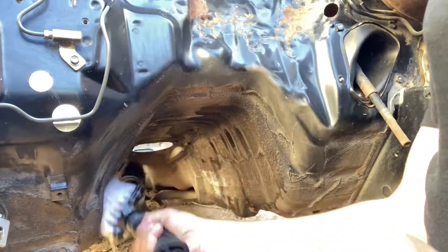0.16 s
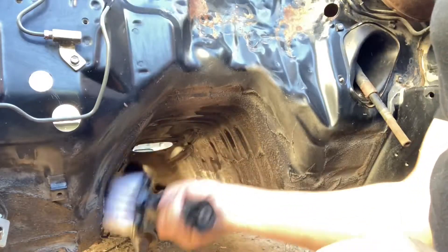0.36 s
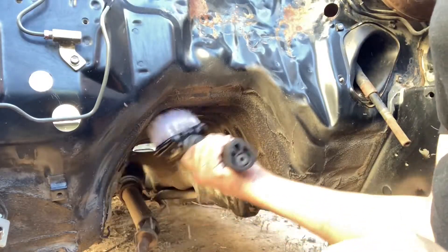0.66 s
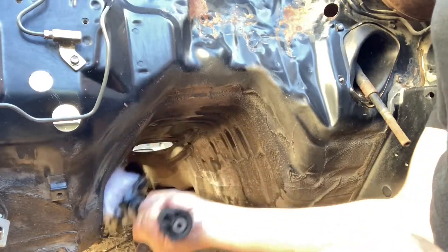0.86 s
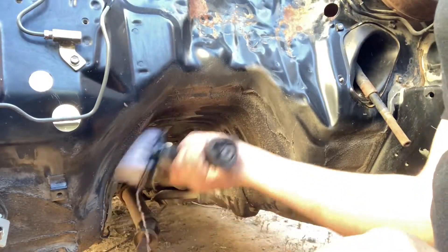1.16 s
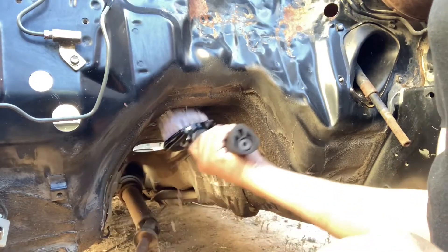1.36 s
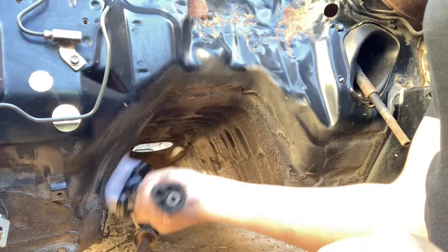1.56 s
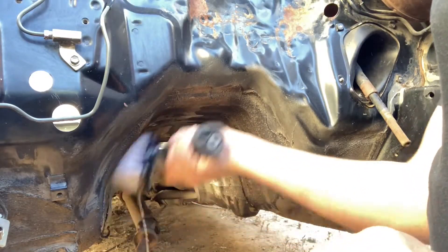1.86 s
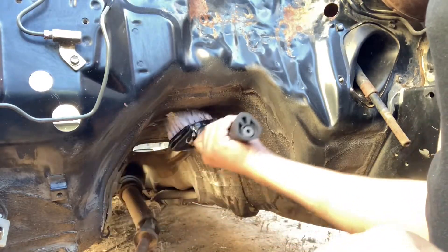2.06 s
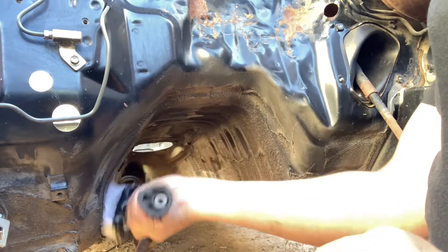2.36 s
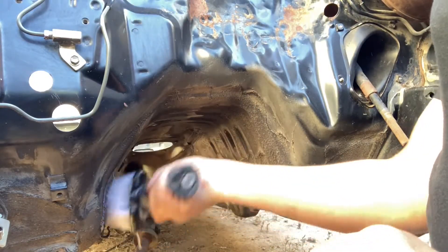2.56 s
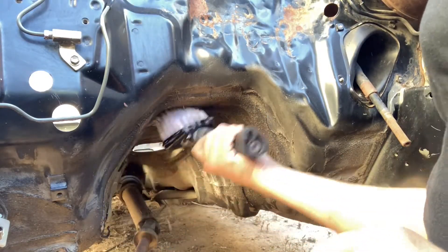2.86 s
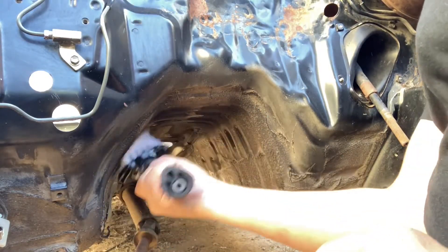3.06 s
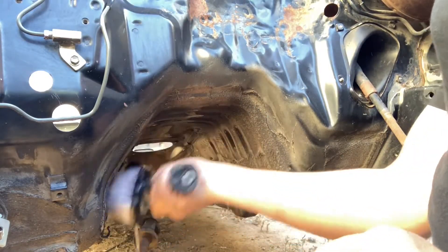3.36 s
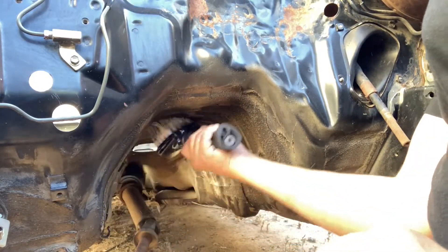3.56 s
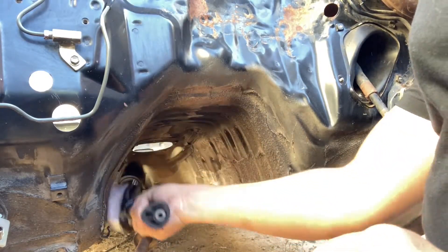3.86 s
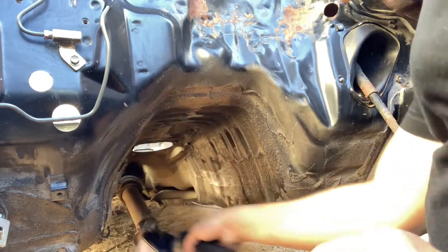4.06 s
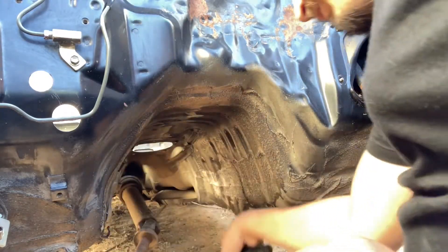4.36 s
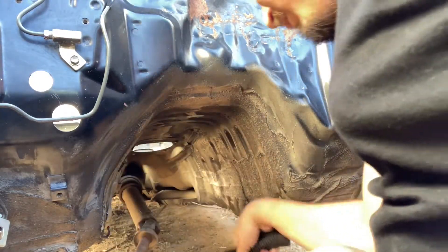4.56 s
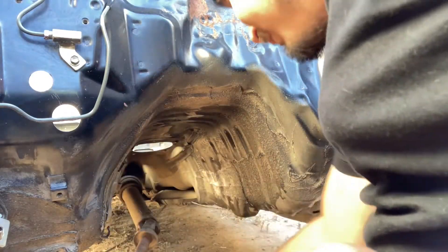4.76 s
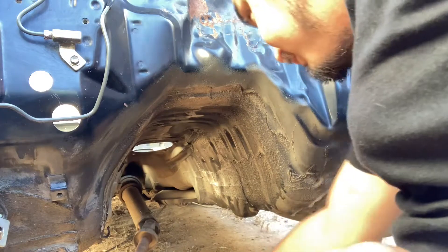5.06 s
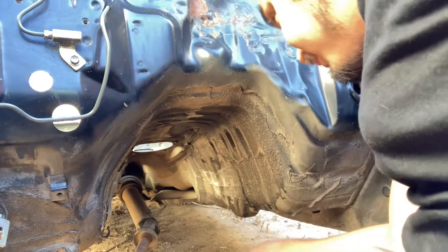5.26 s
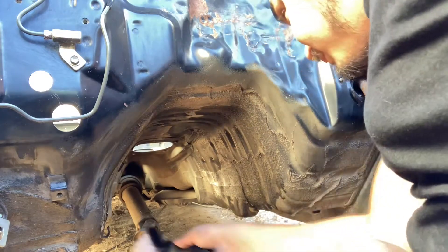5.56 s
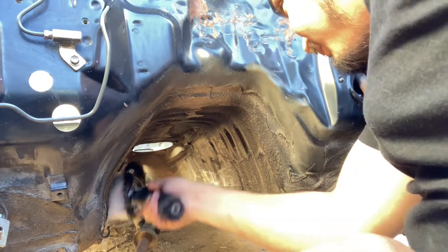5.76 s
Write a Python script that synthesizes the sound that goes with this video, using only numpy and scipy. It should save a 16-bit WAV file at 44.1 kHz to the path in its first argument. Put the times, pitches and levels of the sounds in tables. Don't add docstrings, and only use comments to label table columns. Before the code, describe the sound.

Close by, a stiff-bristled brush scrubs a thin metal car panel, about three strokes a second, each harsh hiss waking a hollow drumming resonance. Two booming knocks of the brush block interrupt. After nearly four seconds the brush lifts away; cloth rustles, grit crackles and small taps cluster. A final brighter stroke begins. Low workshop rumble lies underneath, on a close two-channel phone microphone.

```python
import sys
import numpy as np
from scipy import signal
from scipy.fft import rfft, irfft
from scipy.io import wavfile
from scipy.ndimage import uniform_filter1d

SR = 44100
rng = np.random.default_rng(int(sys.argv[2]) if len(sys.argv) > 2 else 0)


def master_out(mix):
    frames = np.transpose(np.atleast_2d(mix))
    ceiling = np.clip(frames, -1, 1)
    pcm = np.round(ceiling * 32767).astype(np.int16)
    wavfile.write(sys.argv[1], SR, pcm)


def decibels_to_gain(level_db):
    exponent = np.asarray(level_db, float) / 20
    return 10 ** exponent


N = 261072
HZ = np.fft.rfftfreq(N, 1 / SR)
COARSE_S = np.arange(0, N + 32, 32) / SR

# start in seconds, length in seconds, hiss level at the start in dB,
# hiss level at the end in dB, swell in the middle in dB.
STROKES = [(-.05, 0.19, -42, -48.5, -0.9), (.328, 0.15, -42, -44.5, -0.5), (.645, 0.19, -52, -43.5, 2.5),
           (1.038, 0.18, -45, -45.5, 1.5), (1.364, 0.21, -52, -47.5, 5), (1.772, 0.17, -44.5, -47, 2),
           (2.128, 0.17, -47.5, -43, 1), (2.522, .19, -46.5, -43.5, 1), (2.87, 0.22, -54.5, -40.5, -2),
           (3.33, 0.13, -43, -46, 0.5), (3.605, 0.25, -50, -49.5, 6), (5.618, 0.34, -56.5, -50, 12)]
# brightness in dB per octave, then deep mode, wall mode and rib squeak
# in dB against the hiss.
STROKE_SPOTS = [(-4, 0.5, -4, -9), (-0.8, -10, -10, -30), (-2.5, -1, -1.5, -8.5), (0.6, -9, -6.5, -16),
                (-1, -5, 3.8, -7.5), (-0.3, -15, -4.5, -2.5), (-2.5, -6, -8, -9.5), (3, -13.5, -6.5, -17.5),
                (-2.5, -9, -2.5, -8.5), (1.2, -2, -3.5, -1.5), (-3, -7.5, -.6, -8.5),
                (5.2, -17, -7.5, -10.5)]
# frequency in Hz, width in Hz, level in dB.
SPOT_MODES = [(310, 6.3, -3), (461, 107, -3.5), (2750, 39, -5.5)]
# frequency in Hz, density in dB per Hz.
BRISTLE_SPECTRUM = [(120, -19.5), (260, -18), (350, -18.5), (500, -8.5), (900, -12), (1500, -10.5),
                    (2300, -9.5), (4000, -9), (5000, -26), (6800, 19.5), (9000, -73.5), (10400, -35),
                    (13000, -40.5), (16000, -51)]
# frequency in Hz, width in Hz, level in dB.
PAN_MODES = [(235.7, 6, -2.5), (863, 104, -8), (1223, 58, -6), (2064, 15, -18)]
# frequency in Hz, width in Hz, level in dB.
LAST_PAN_MODES = [(548, 64, 0), (862, 74, -9.5), (1240, 13, 0), (1760, 150, -2), (2800, 32, -15),
                  (3120, 83, -4.5), (3900, 110, -0.5), (3970, 11, -10)]
RISE_DB_PER_S, FALL_DB_PER_S = (430, 600), (330, 235)
FLEX_DB, FLEX_DB_PER_S = -20, 49
LIFT_S, LIFT_DB_PER_S, LAND_S = 3.87, 192, 5.6
FULL_DB, DULLING = -46, 0.29
RING_FALL_DB_PER_S = 141.5

# time in seconds, peak in dB.
KNOCKS = [
    (1.867, -9),
    (3.437, -12.5),
]
# frequency in Hz, level in dB, 60 dB decay in seconds.
KNOCK_MODES = [
    [(109.3, -14, 0.62), (231, -6.5, 0.68), (307.5, 3.5, 0.4), (382, -46, 0.73), (469, -4.5, 0.47),
     (554, 4, 0.24), (703, -44, 2.3), (784, -10, 0.12), (1050, -32, 0.1), (1140, -29, 0.31),
     (1251, -17.5, 0.5), (1530, -28, 0.1), (1620, -15, 0.33), (1683, -31, 0.33)],
    [(231, -4, 0.62), (325.2, 2, 0.29), (420, 5.5, 0.14), (473, -7, 0.33), (568, -1, 0.24),
     (797, -5.5, 0.4), (940, -13, 0.32), (1138, -8, 0.32), (1156, -41, 0.27), (1291, 3, 0.14),
     (1707, -39, 0.14), (2290, -22, 0.19), (2680, -41.5, 0.41), (3470, -42.5, 0.23), (3537, -36.5, 0.19),
     (3978, -42, 0.28)],
]
# level in dB, frequency in Hz, width in Hz.
BLOCK_CRACKS = [(-23, 3400, 2400), (2, 3000, 290)]
# frequency in Hz, first knock in dB, second knock in dB, 60 dB decay in seconds.
BODY_BOOM = [(97.3, -18, -30, 0.43), (250, -14.5, -10.5, 0.54), (500, -9, -12, 0.36),
             (1000, -15, -10.5, 0.24), (2000, -21.5, -17.5, 0.16), (4000, -35, -26.5, 0.2)]

# peak time in seconds, peak in dB, rise over 20 dB in seconds, fall over 20 dB in seconds,
# brightness in dB per octave.
SWISHES = [(4.094, -40.5, .01, 0.054, -1), (4.171, -52.5, 0.035, 0.12, -6), (4.255, -62, 0.084, .05, -5),
           (4.37, -54.5, .12, 0.074, -5), (4.418, -55, 0.13, 0.027, 4), (4.692, -65, 0.03, 0.21, -2.5),
           (4.77, -64, 0.116, 0.12, -1.5), (4.845, -65.5, 0.026, 0.15, -9),
           (4.868, -45.5, 0.015, 0.0092, 6), (4.893, -52, .01, 0.044, -3), (5.08, -61, 0.081, 0.15, -6.5),
           (5.17, -65.5, 0.088, 0.15, -9.5), (5.27, -61, 0.053, 0.05, -7.5), (5.38, -58, 0.17, 0.079, 4.5),
           (5.557, -57, 0.0071, 0.026, 2.5)]
# frequency in Hz, density in dB per Hz.
CLOTH_SPECTRUM = [(180, -45), (300, -2), (397, -14), (580, -36), (920, -23.5), (1280, 0.5), (1690, -10.5),
                  (2240, -10), (6430, -10.5), (14200, -73.5), (15400, -37)]
# frequency in Hz, width in Hz, level in dB.
HANDLE_MODES = [(905, 120, -9), (1730, 43, -8.5), (2950, 200, -10)]
# time in seconds, peak in dB, ring in Hz, upper ring in Hz, tick in dB.
TAPS = [(.345, -35.5, 218.5, 525, -17), (3.336, -31.5, 235, 500, -4), (4.089, -47.5, 362, 1120, 1),
        (4.166, -47, 410, 1620, -3), (4.416, -52.5, 554, 1190, -5), (4.498, -67, 468, 2750, 9),
        (4.679, -58.5, 390, 950, -1), (4.69, -44.5, 362, 1690, -14), (4.837, -54, 430, 1650, -4),
        (4.848, -36.5, 452, 730, -17), (4.862, -37.5, 457, 1758, -0.5), (4.893, -48, 453, 1740, 8),
        (4.955, -60.5, 390, 1100, 10.5), (4.746, -42.5, 394, 890, -13), (5.033, -39, 397, 740, -8),
        (5.074, -37.5, 420, 1000, -8), (5.098, -42.5, 398, 1110, -3), (5.138, -51, 397, 870, -2),
        (5.2, -44, 382, 933, 5), (5.262, -49.5, 378, 940, -9), (5.3, -43.5, 400, 895, -8),
        (5.341, -51, 370, 1660, -7), (5.552, -36, 413, 1060, -16), (5.609, -38.5, 567, 2260, -7)]
RING_CYCLES, UPPER_CYCLES = 38, 45

# frequency in Hz, density in dB per Hz.
RUMBLE_SPECTRUM = [(13, -46), (22, -46.5), (36, -11), (55, -7), (82, -4.5), (127, -14.5), (180, -16.5),
                   (400, -26), (800, -30), (1500, -45), (3000, -47), (6000, -59), (10000, -62),
                   (15400, -65)]
# time in seconds, level in dB.
RUMBLE_LEVEL = [(0.0, -52), (1.4, -52), (2.04, -46.5), (2.98, -50), (3.43, -47), (3.81, -46), (4.15, -49),
                (4.65, -51), (5.08, -48), (5.92, -51.5)]
# frequency in Hz, width in Hz, level in dB.
ROOM_MODES = [(53, 11, 6), (78, 23, 4.5), (111.1, 15, 6.5), (114.1, 5, 7)]

# frequency in Hz, difference in dB.
LEFT_LOUDER = [(60, 0), (110, 6.5), (200, 1.5), (380, 10), (700, 1), (1290, 3.5), (2380, 0), (4400, 1.0),
               (8120, 4), (15000, -3.5)]
# frequency in Hz, coherence from 0 to 1.
LIKENESS = [(30, .85), (60, .9), (200, .5), (380, .8), (700, .5), (3000, .48), (4600, .33), (8400, .3),
            (9000, .75), (9600, .75), (10400, .65), (13000, .4)]
# frequency in Hz, phase in radians.
PORT_PHASE = [(0, 0), (150, -.6), (300, .4), (550, .3), (800, 1.5), (1200, 0), (2500, -1.4), (4200, -1.7),
              (6000, -3.4), (8400, -5.6), (9600, -6.3), (10500, -9.4), (12000, -12.6), (22050, -12.6)]
EMPTY_HZ, CUTOFF_HZ = (10450, 12300), 15300
CEILING = 1
TOP_GATE_DB = -70.5


def scrub():
    t = np.arange(N) / SR
    hiss_db, (tilt_db, *places_db) = pressure()
    tilt_db = tilt_db - DULLING * np.clip(FULL_DB - hiss_db, 0, 25)
    ring_fall_db = RING_FALL_DB_PER_S * t
    held_db = np.maximum.accumulate(hiss_db + ring_fall_db) - ring_fall_db - hiss_db
    slips = grains(18000, spread_db=2)
    hiss = coloured(slips, BRISTLE_SPECTRUM, tilt_db, patchy_db=1.5, low_hz=116.1)
    treble = signal.sosfilt(signal.butter(4, [2000, 9000], "band", fs=SR, output="sos"), hiss)
    drum = decibels_to_gain(-2.5) * small_modes(slips, BRISTLE_SPECTRUM, count=32, sharp=108)
    for (hz, width_hz, db), place_db in zip(SPOT_MODES, places_db):
        level_db = db + place_db + held_db + 3 * drift(6.9)
        drum += decibels_to_gain(level_db) * rms_one(resonance(slips[1], hz, width_hz))
    last = t > 5
    for modes, here in ((PAN_MODES, ~last), (LAST_PAN_MODES, last)):
        for k, (hz, width_hz, db) in enumerate(modes):
            level_db = db + 18.5 + 4.23 * drift(6)
            drum += here * decibels_to_gain(level_db) * resonance(slips[k % 2], hz, 0.93 * width_hz)
    return decibels_to_gain(hiss_db + 0.73 * drift(35)) * (decibels_to_gain(-1.5) * hiss / np.std(treble) + drum)


def pressure():
    t, levels_db = COARSE_S, []
    for k, (s, length_s, first_db, last_db, swell_db) in enumerate(STROKES):
        along = np.clip((t - s) / length_s, 0, 1)
        before_s = np.maximum(s - t, 0)
        after_s = np.maximum(t - s - length_s, 0)
        edge = decibels_to_gain(-RISE_DB_PER_S[k % 2] * before_s - FALL_DB_PER_S[k % 2] * after_s)
        flex = decibels_to_gain(FLEX_DB - FLEX_DB_PER_S * (before_s + after_s))
        held_db = first_db + (last_db - first_db) * along + swell_db * np.sin(np.pi * along)
        levels_db.append(held_db + 20 * np.log10(edge + flex))
    lift_db = (t < LAND_S) * LIFT_DB_PER_S * np.maximum(t - LIFT_S, 0)
    return blend(np.array(levels_db) - lift_db, STROKE_SPOTS)


def knocks():
    out, size = np.zeros((2, N)), int(.7 * SR)
    t = np.arange(size) / SR
    for k, ((s, db), modes, crack) in enumerate(zip(KNOCKS, KNOCK_MODES, BLOCK_CRACKS)):
        crack_db, crack_hz, width_hz = crack
        noise = resonance(rng.standard_normal((2, size)), crack_hz, width_hz)
        noise = rms_one(resonance(noise, crack_hz, width_hz))
        blow = noise * decibels_to_gain(crack_db - 10.5 - 60 * t / 0.035)
        for m, (hz, mode_db, t60_s) in enumerate(modes):
            rise = 1 - np.exp(-t * hz / 0.56)
            phase = [[np.pi * m], [np.pi * m + rng.normal(0, 3)]]
            t60_s = min(t60_s, 0.12 + 140 / hz)
            ring = np.sin(2 * np.pi * hz * t + phase) * [[1], [.95]]
            blow += decibels_to_gain(mode_db - 6 - 60 * t / t60_s) * rise * ring
        for hz, sos in bands(73.6, 5300):
            dying = rng.standard_normal((2, size)) * decibels_to_gain(-60 * t / at_hz(BODY_BOOM, hz, axis=3))
            boom_db = at_hz(BODY_BOOM, hz, axis=1 + k) - 2.5
            blow += decibels_to_gain(boom_db) * signal.sosfilt(sos, dying) * np.sqrt(SR / hz)
        soft_start = 1 - np.exp(-t / 0.0005)
        out[:, round(s * SR):][:, :size] += decibels_to_gain(db) * blow * soft_start
    return out


def handling():
    return rustle() + taps()


def rustle():
    level_db, tilt_db = swishes()
    swish = rms_one(coloured(grains(3000, spread_db=2.5), CLOTH_SPECTRUM, tilt_db, patchy_db=3.5, low_hz=341))
    grit = small_modes(grains(140, spread_db=3.5), CLOTH_SPECTRUM, count=12, sharp=37)
    rubs, handle = grains(200, spread_db=5), 0
    for k, (hz, width_hz, db) in enumerate(HANDLE_MODES):
        handle = handle + decibels_to_gain(db) * rms_one(resonance(rubs[k % 2], hz, width_hz))
    return decibels_to_gain(level_db) * (decibels_to_gain(1.5) * swish + decibels_to_gain(-6.5) * grit + handle)


def swishes():
    t, levels_db = COARSE_S, []
    for s, db, rise_s, fall_s, _ in SWISHES:
        levels_db.append(db - 20 * np.where(t < s, (s - t) / rise_s, (t - s) / fall_s))
    level_db, (tilt_db,) = blend(np.array(levels_db), np.array(SWISHES)[:, -1:])
    return level_db, tilt_db


def taps():
    out = np.zeros((2, N))
    t = np.arange(SR // 4) / SR
    dull = signal.butter(4, 2600, fs=SR, output="sos")
    for s, db, hz, upper_hz, tick_db in TAPS:
        noise = rng.standard_normal((2, len(t)))
        ring = np.sin(2 * np.pi * hz * t) + 0.22 * rms_one(resonance(noise, hz, 0.17 * hz))
        upper_noise = rms_one(resonance(noise, upper_hz, 0.023 * upper_hz))
        upper = np.sin(2 * np.pi * upper_hz * t) + 0.5 * upper_noise
        tick = 1.6 * signal.sosfilt(dull, noise) * decibels_to_gain(-60 * t / 0.033)
        fade = decibels_to_gain(-60 * t * hz / RING_CYCLES)
        upper_fade = decibels_to_gain(-60 * t * upper_hz / UPPER_CYCLES)
        tap = ring * fade + decibels_to_gain(tick_db + 5.5) * (upper * upper_fade + tick)
        out[:, round(s * SR):][:, :len(t)] += decibels_to_gain(db - 7.5) * tap
    return out


def rumble():
    shape = decibels_to_gain(at_hz(RUMBLE_SPECTRUM, HZ))
    for hz, width_hz, db in ROOM_MODES:
        shape = shape * decibels_to_gain(db / (1 + (2 * (HZ - hz) / width_hz) ** 2))
    noise = irfft(rfft(rng.standard_normal((2, N))) * shape, N)
    return decibels_to_gain(in_time(RUMBLE_LEVEL)[0] + 3) * rms_one(noise)


def grains(per_s, spread_db):
    shape = (2, 2, N)
    sizes = decibels_to_gain(spread_db * np.minimum(rng.exponential(1, shape), 5)) * rng.choice([-1, 1], shape)
    return rms_one(sizes * (rng.random(shape) < per_s / SR) + 1e-9)


def coloured(slips, spectrum, tilt_db, patchy_db, low_hz):
    out, together = 0, drift(5.5)
    for k, (hz, sos) in enumerate(bands(low_hz, 18000)):
        flicker_db = patchy_db * (together + drift(11))
        db = at_hz(spectrum, hz) + tilt_db * np.log2(hz / 4000) + flicker_db
        out = out + decibels_to_gain(db) * signal.sosfilt(sos, slips[k % 2])
    return out


def small_modes(slips, spectrum, count, sharp):
    out = 0
    for k, hz in enumerate(np.geomspace(650, 4800, count) * rng.uniform(0.94, 1.03, count)):
        db = at_hz(spectrum, hz) + 2.15 * drift(10.5)
        ring = rms_one(resonance(slips[k % 2], hz, 14 + hz / sharp))
        out = out + decibels_to_gain(db) * np.sqrt(hz) * ring
    return rms_one(out)


def resonance(x, hz, width_hz):
    r = np.exp(-np.pi * width_hz / SR)
    zeros = np.array([1, 0, -1]) * (1 - r * r) / 2
    poles = [1, -2 * r * np.cos(2 * np.pi * hz / SR), r * r]
    return signal.lfilter(zeros, poles, x)


def bands(low_hz, top_hz):
    count = round(2 * np.log2(top_hz / low_hz))
    edges = np.geomspace(low_hz, top_hz, count + 1)
    return [(np.sqrt(a * b), signal.butter(2, [a, b], "band", fs=SR, output="sos"))
            for a, b in zip(edges, edges[1:])]


def drift(rate_hz):
    r = np.exp(-80 * np.pi * rate_hz / SR)
    noise = rng.standard_normal(N // 40 + 2002)
    slow = signal.lfilter([1], [1, -2 * r, r * r], noise)[2000:]
    return np.interp(np.arange(N) / 40, np.arange(len(slow)), rms_one(slow))


def blend(levels_db, columns):
    power = decibels_to_gain(levels_db) ** 2 + 1e-30
    total = power.sum(axis=0)
    mixed = np.transpose(columns) @ (power / total)
    level_db, *mixed = in_time(np.vstack([COARSE_S, 10 * np.log10(total), mixed]).T)
    return level_db, mixed


def in_time(rows):
    s, *columns = np.transpose(rows)
    return [np.interp(np.arange(N) / SR, s, c) for c in columns]


def at_hz(points, hz, axis=1):
    points = np.array(points)
    return np.interp(np.log(hz + 1), np.log(points[:, 0]), points[:, axis])


def rms_one(x):
    return x / np.sqrt(np.mean(x ** 2) + 1e-20)


def scene():
    return scrub() + knocks() + handling() + rumble()


def low_pass(x):
    return signal.sosfilt(signal.butter(12, 15620, fs=SR, output="sos"), x)


def record(dry):
    direct, diffuse = rfft(dry)
    alike = np.clip(at_hz(LIKENESS, HZ), 0, 1)
    turn = np.exp(1j * np.interp(HZ, *np.transpose(PORT_PHASE)))
    half = decibels_to_gain(at_hz(LEFT_LOUDER, HZ) / 2)
    left = half * direct
    right = (alike * turn * direct + np.sqrt(1 - alike ** 2) * diffuse) / half
    ports = irfft([left, right], N)
    spectrum = rfft(CEILING * np.tanh(ports / CEILING))
    low = irfft(spectrum * (HZ < EMPTY_HZ[0]), N)
    top = irfft(spectrum * (HZ > EMPTY_HZ[1]) * (HZ < CUTOFF_HZ), N)
    power = uniform_filter1d(np.mean(top ** 2, axis=0), size=1024)
    top *= .55 + 0.47 * power ** 2 / (power ** 2 + decibels_to_gain(TOP_GATE_DB) ** 4)
    return low_pass(low + top)


dry = scene()
out = record(dry)
master_out(out)
```